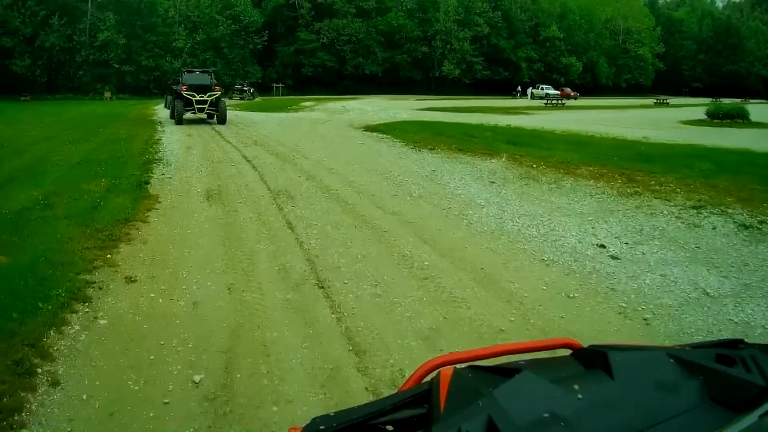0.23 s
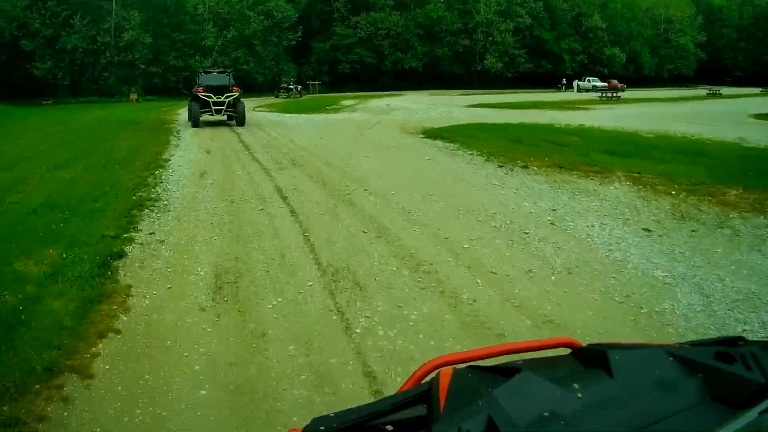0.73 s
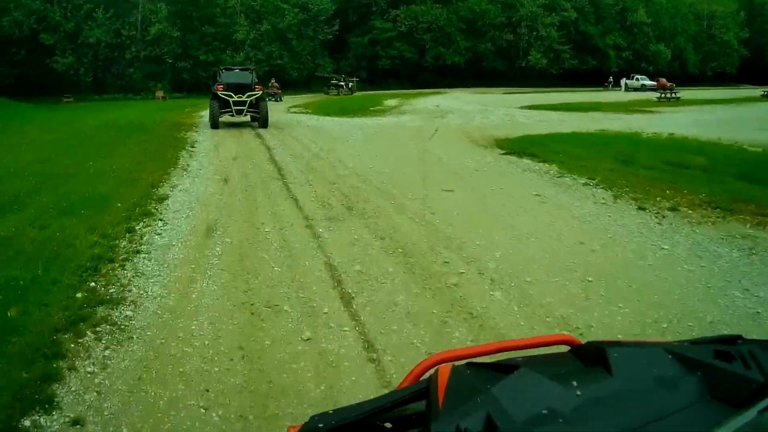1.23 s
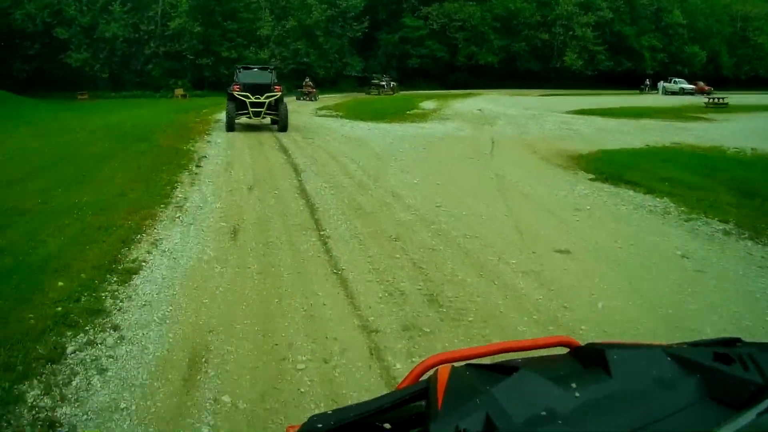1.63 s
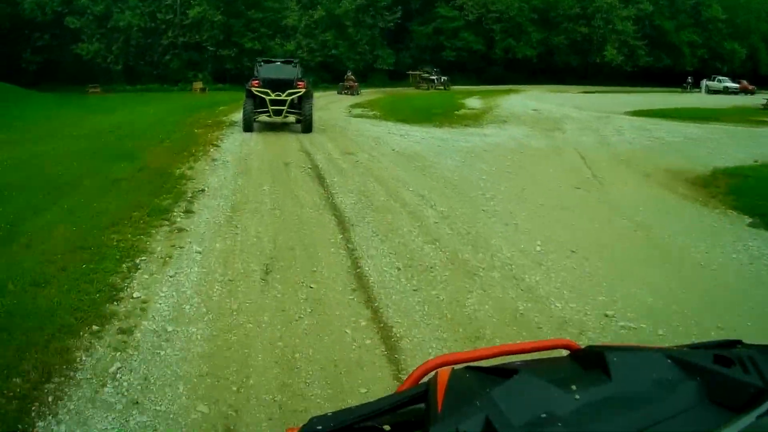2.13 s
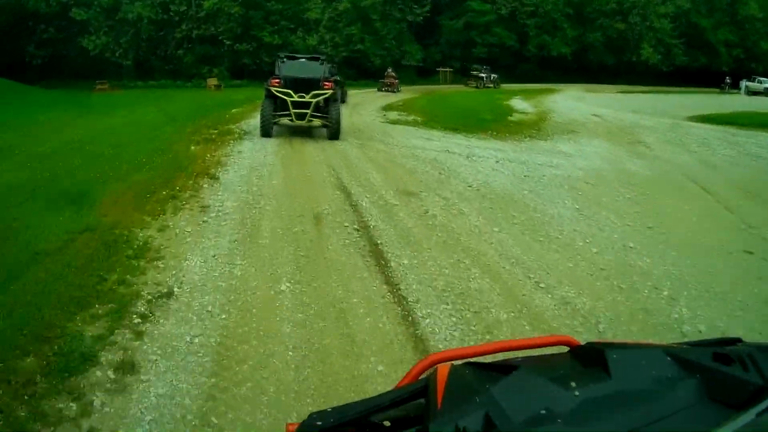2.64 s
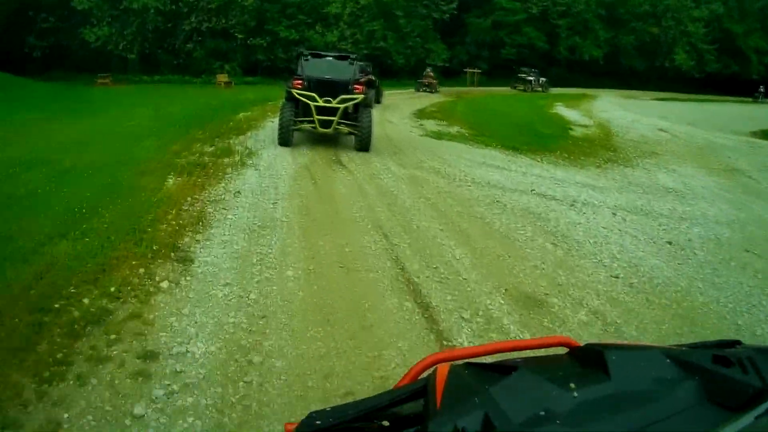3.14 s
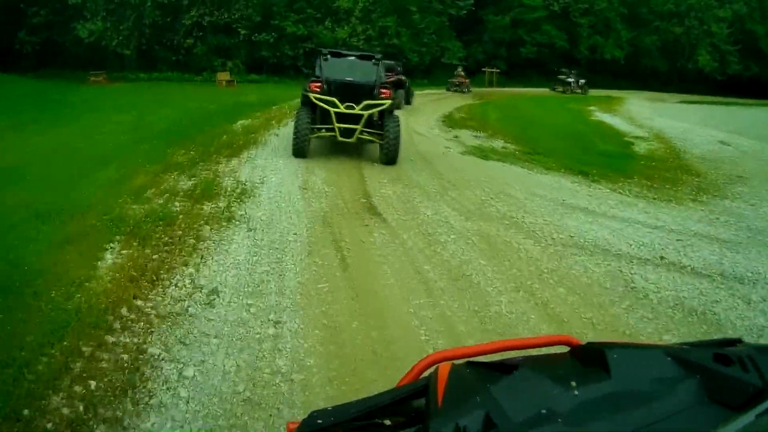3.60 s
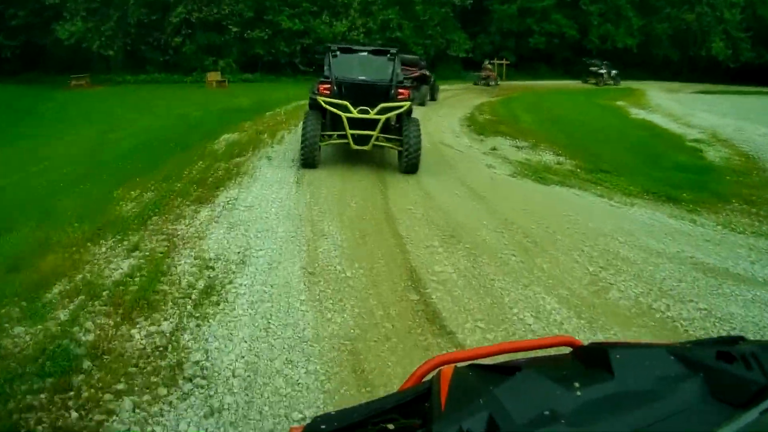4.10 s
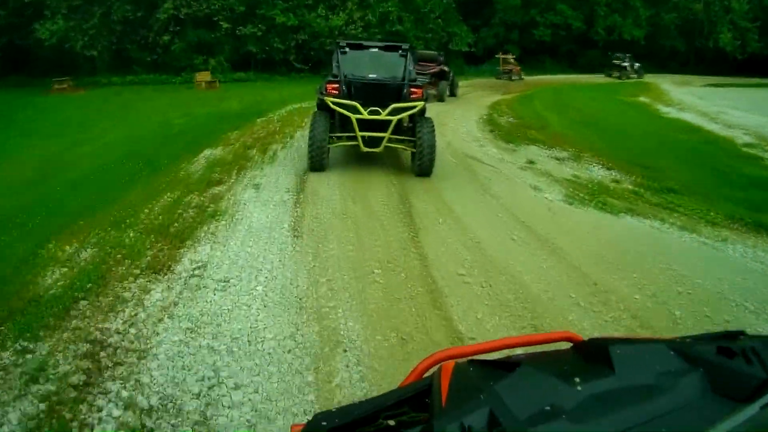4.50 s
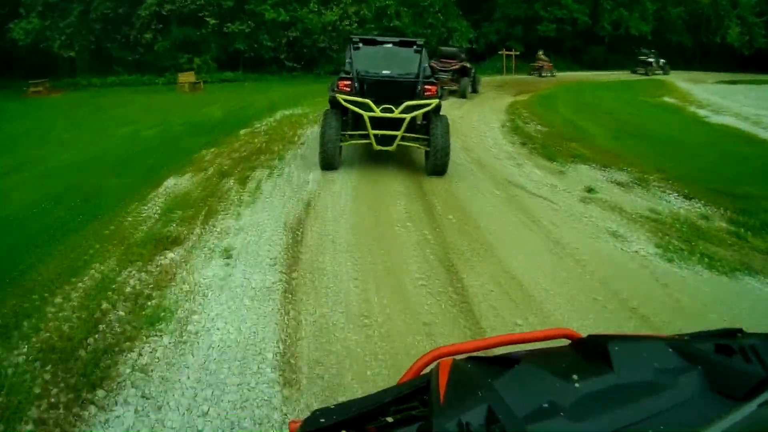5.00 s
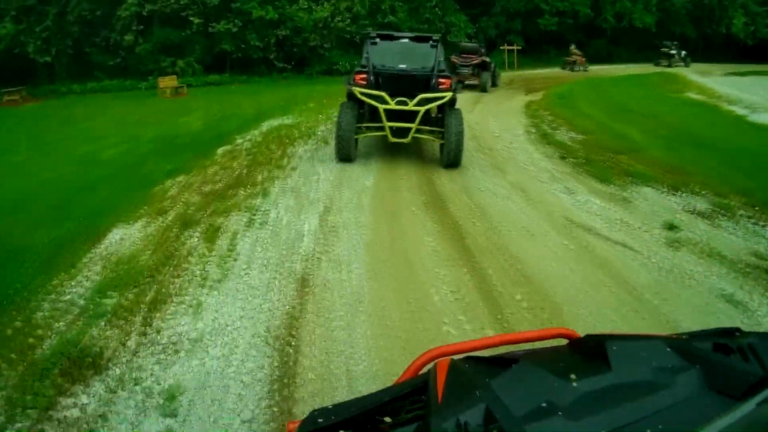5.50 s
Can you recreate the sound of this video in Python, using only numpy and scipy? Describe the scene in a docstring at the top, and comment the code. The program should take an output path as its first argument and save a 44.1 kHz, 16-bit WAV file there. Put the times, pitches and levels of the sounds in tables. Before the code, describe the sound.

An off-road buggy engine drones over rumbling gravel, eases off, coasts with low chugging knocks, then pulls again with a howl.

```python
"""An engine drones over rumbling, crunching gravel, heard from the open cab of an off-road buggy.
It cruises, eases off with a scrape of its drive belt, coasts with a low boom and runs of chugs,
then pulls again with a howl. The drone is a stack of "orders": tones at whole multiples of the
engine's cycle rate. The exhaust puffs, the valve gear clatters, a low two-note hum slowly rises
in pitch, bumps thud through the frame, and a few thrown stones tick against the body."""
import sys
import numpy as np
from scipy import signal
from scipy.fft import rfft, irfft
from scipy.io import wavfile
from scipy.ndimage import uniform_filter1d, minimum_filter1d

SR = 44100
rng = np.random.default_rng(int(sys.argv[2]) if len(sys.argv) > 2 else 0)


def generate_wav(sig):
    """Save sig (samples, or channels by samples) to the path in sys.argv[1] as 16-bit PCM at SR."""
    pcm = np.round(np.clip(np.atleast_2d(sig).T, -1, 1) * 32767).astype(np.int16)
    wavfile.write(sys.argv[1], SR, pcm)


N = 253575
TIME = np.arange(N) / SR


def amp(db):
    """Turns decibels into a number to multiply by."""
    return 10 ** (np.asarray(db) / 20)


def unit(x):
    """Scales a signal to an average (rms) strength of 1."""
    return x / np.sqrt(np.mean(x ** 2) + 1e-20)


def curves(table):
    """Joins timed rows with straight lines, giving one curve for each column after the time."""
    seconds, *columns = np.transpose(table)
    return [np.interp(TIME, seconds, column) for column in columns]


def wander(hz):
    """A smooth random wobble of strength 1, moving up to about hz times a second."""
    freqs = np.fft.rfftfreq(N, 1 / SR)
    return unit(irfft(rfft(rng.standard_normal(N)) / (1 + (freqs / hz) ** 4), N))


def colour(x, spectrum, size=8192):
    """Shapes the lows and highs of x with a filter that rings only after a sound, never before."""
    hz, db = np.transpose(spectrum)
    log_hz = np.log(abs(np.fft.fftfreq(size, 1 / SR)) + 1)
    log_gain = np.log(amp(np.interp(log_hz, np.log(hz), db, right=-100)))
    response = np.fft.ifft(np.exp(np.conj(signal.hilbert(log_gain)))).real
    return signal.oaconvolve(x, response[:size // 2])[:N]


def boost(pitch, peaks):
    """The decibels a tone gains or loses from the peaks and dips near its pitch."""
    return sum(db / (1 + ((pitch - centre) / width) ** 2) for centre, width, db in peaks)


# How fast the engine runs. Each row: time in seconds, cycles a second.
ENGINE_SPEED = [(0, 41.51), (.5, 41.45), (.8, 41.62), (1.28, 41.5), (1.53, 40.97), (1.7, 39.32),
                (1.9, 37.69), (2.15, 36.56), (2.47, 35.95), (2.61, 35.87), (2.75, 34.37), (2.95, 33.58),
                (3.09, 31.27), (3.35, 29.52), (3.8, 27.86), (4.45, 25.84), (4.8, 24.46), (5.09, 22.21),
                (5.2, 25.27), (5.3, 28.17), (5.4, 29.36), (5.61, 29.3), (5.75, 30.4)]

def crankshaft(start_turn=-.232):
    """The turning crank sets the beat: gives its speed and a running count of engine cycles."""
    cycle_hz, = curves(ENGINE_SPEED)
    return cycle_hz, start_turn + np.cumsum(cycle_hz) / SR


# Cruising, eased off, throttle closing, coasting, pulling. Each row: start in seconds, glide in
# seconds, then in dB the drone, lift of every third order, throb, boom, howl, shake, rasp and
# clatter, and last the depth of the exhaust puffs.
THROTTLE_STAGES = [(0, .01, 0.5, 5, -33.5, -26.5, -51, -19.5, -40, -34, 0.17),
                   (1.55, 0.19, 1.5, 1.8, -29.5, -33.5, -45, -21, -21, -35, 0.16),
                   (2.66, 0.071, -1.5, 4, -24, -15, -36, -27, -18, -35, 0.24),
                   (2.92, 0.2, -7.5, 0.5, -19, -16.5, -29.5, -29, -22.5, -36, 0.44),
                   (5.1, 0.19, -1, -1.5, -47, -21, -15.5, -35, -18, -35, 1.1)]

def throttle():
    """The engine's levels glide from one stage of the drive to the next."""
    levels = np.array(THROTTLE_STAGES[0][2:], float)[:, None]
    for start, glide_s, *target in THROTTLE_STAGES:
        share = np.clip((TIME - start) / glide_s, 0, 1)
        levels = levels * (1 - share) + np.array(target)[:, None] * share
    return levels


# The engine's tone before any boosts. Each row: pitch in Hz, level in dB.
ENGINE_TONE = [(60, -32), (120, -42), (225, -31), (400, -38.5), (600, -45), (1000, -48), (1500, -59.5),
               (1900, -70.5), (2500, -74)]
# Where the exhaust pipe and cab ring. Each row: pitch in Hz, half width in Hz, boost in dB.
PIPE_RINGS = [(179, 26, 7), (265.2, 20, 13), (340.4, 33, 15), (396.6, 22.3, 10.5), (463.6, 6.9, 14),
              (498, 2.6, 0), (536, 23, 14.5), (708, 26.3, 16.5), (770.5, 10, 10), (836, 16, 9),
              (1013, 36, 12.5), (1133, 17, 7.5), (1263, 12, 9), (1370, 6.4, 7.5), (1685, 62, 12.5),
              (2245, 17, 12), (2455, 7.3, 14)]
# Orders that stand out or hang back. Each row: order, half width in orders, boost or cut in dB.
ORDER_ACCENTS = [(10.1, .6, 1), (6.33, .7, -12.5), (11.33, .4, -11), (22.76, .6, -7), (24.2, .6, 3),
                 (29.45, .6, -10), (31, .4, 6), (40.3, .6, 3.5)]

def engine(cycle_hz, turns, drone_db, third_db, throb_db, boom_db, howl_db, shake_db):
    """A double thump each cycle makes a stack of tones, which slide through the pipe's resonances."""
    second_share, second_delay = 0.33, .239  # the second thump: its strength, its delay in cycles
    extra_db = {3: throb_db, 4: boom_db, 12: howl_db}  # the orders that throb, boom and howl
    crank = turns + .001 * wander(18.0)  # the crank never turns quite evenly
    tones = amp(shake_db) * np.cos(2 * np.pi * crank)  # the frame shakes once a cycle
    grid_hz = np.arange(1, SR // 16)
    hz, db = np.transpose(ENGINE_TONE)
    pipe_db = np.interp(np.log(grid_hz), np.log(hz), db) + boost(grid_hz, PIPE_RINGS)
    for order in range(2, 61):
        order_hz = order * cycle_hz
        thump_pair = abs(1 + second_share * np.exp(-2j * np.pi * order * second_delay))
        bright_db = drone_db * np.log2(np.maximum(order_hz / 390, 1))  # load lifts tones above 390 Hz
        accent_db = boost(order, ORDER_ACCENTS) + third_db * (order % 3 == 0)
        gain = thump_pair * amp(drone_db + bright_db + accent_db + np.interp(order_hz, grid_hz, pipe_db))
        if order in extra_db:
            gain = np.hypot(gain, amp(extra_db[order]))
        # higher orders arrive later through the pipe, and further out of step
        lag = order * (0.917 + 0.054 * rng.standard_normal()) + .14 * max(order - 13, 0) ** 2
        tones -= gain * np.cos(2 * np.pi * order * crank - lag)
    uneven = 1 + .08 * wander(25)  # no two firings are equally strong
    lope = .15 * np.clip((TIME - 5.12) * 10, 0, 1)  # in the final pull, every second cycle is stronger
    return np.sqrt(2) * tones * uneven * (1 + lope * np.cos(np.pi * turns))


# The tone of the rushing gas. Each row: pitch in Hz, relative level in dB.
EXHAUST_TONE = [(100, -24.5), (230, -4.5), (340, 3), (420, -7), (500, -6.5), (620, -8), (780, -11.5),
                (1100, -16), (2000, -53.5)]

def exhaust_rasp(turns, level_db, depth, uneven_db=2.0, trim_db=-1):
    """Gas leaves the exhaust in one uneven puff a cycle; deeper puffs throb harder."""
    puffs = np.exp(depth * np.cos(2 * np.pi * turns - 0.68))
    puffs /= np.sqrt(np.i0(2 * depth))  # keeps the power the same at any depth
    puffs *= amp(uneven_db * wander(15))
    return amp(level_db + trim_db) * unit(colour(puffs * rng.standard_normal(N), EXHAUST_TONE))


# The tone of the rattling metal. Each row: pitch in Hz, relative level in dB.
CLATTER_TONE = [(200, -7), (450, 4), (800, 0), (1050, -5), (1200, -6), (1450, -6.5), (1690, -9),
                (1900, -14.5), (2300, -17.5), (2600, -23), (2900, -25.5), (4500, -41), (9000, -83)]

def clatter(turns, level_db, drone_db, loose_db=5.5, repeat_db=-17.5):
    """Valve gear and clutch rattle; part repeats every cycle, more so when the drone is strong."""
    pattern = sum(np.cos(2 * np.pi * (order * turns + rng.random())) for order in range(30, 64))
    repeating = unit(colour(pattern, CLATTER_TONE))
    beat = np.exp(0.032 * np.cos(2 * np.pi * turns - 1) + 0.058 * np.cos(8 * np.pi * turns))
    loose = unit(colour(beat * rng.standard_normal(N), CLATTER_TONE))
    return amp(level_db) * (amp(loose_db) * loose + amp(repeat_db + drone_db) * repeating)


# The belt's scrape, loudest as the throttle eases. Each row: time in seconds, level in dB.
BELT_LEVELS = [(0, -41), (1.5, -42), (1.9, -52), (2.35, -43), (2.47, -31), (2.58, -34), (2.68, -52),
               (2.8, -37.5), (3.1, -47), (5.75, -58)]
# The ring of its housing. Each row: pitch in Hz, relative level in dB.
HOUSING_TONE = [(700, -41), (1350, -21), (1550, 3), (1680, 2), (1780, -5), (1950, -11), (3500, -25.5),
                (8000, -58)]

def belt(turns, depth=0.67):
    """The slack drive belt scrapes twice a cycle and rings its housing."""
    level_db, = curves(BELT_LEVELS)
    scrape = np.exp(depth * np.cos(4 * np.pi * turns)) * rng.standard_normal(N)
    return amp(level_db) * unit(colour(scrape, HOUSING_TONE))


# The tones of the rumble and of the deeper sway. Each row: pitch in Hz, relative level in dB.
RUMBLE_TONE = [(30, -18.5), (70, -11), (100, -8.5), (135, 1.5), (175, -3.5), (215, -6), (260, -11.5),
               (350, -21.5), (800, -53), (3000, -79)]
SWAY_TONE = [(8, -34.5), (18, -6), (30, 4), (60, 2.5), (90, 4), (160, -19), (400, -63.5)]

def chassis(rumble_db, sway_db, thud, lumpy_db=0.5):
    """The frame and panels rumble and sway; a bump swells the sway into a deep thud."""
    shaking = rng.standard_normal(N) * amp(lumpy_db * wander(51))
    rumble = unit(colour(shaking, RUMBLE_TONE))
    sway = unit(colour(rng.standard_normal(N), SWAY_TONE))
    return amp(rumble_db) * rumble + (amp(sway_db) + thud) * sway


# The low hum. Each row: time in seconds, lower note in Hz, level in dB before the cab's boost.
RISING_HUM = [(0, 92, -44.5), (1.3, 96, -32.5), (2.0, 102, -32), (2.55, 106, -38.5), (2.75, 107.5, -37),
              (3.3, 112, -27), (3.55, 116, -23.5), (3.7, 121, -25), (4.1, 131, -28), (4.5, 137, -25.5),
              (5.0, 143.3, -26), (5.75, 147, -29.5)]
# Where the cab rings and boosts the hum. The one row: pitch in Hz, half width in Hz, boost in dB.
CAB_RING = [(138.4, 20.4, 9)]

def rising_hum(upper_ratio=1.26, waver_cycles=0.06, flutter=0.16):
    """A low two-note hum slowly rises in pitch; each note wavers and flutters on its own."""
    hz, level_db = curves(RISING_HUM)
    cycles = np.cumsum(hz) / SR
    hum = np.zeros(N)
    for ratio in (1, upper_ratio):
        tone = np.sin(2 * np.pi * (ratio * cycles + waver_cycles * wander(1.2)))
        hum += amp(boost(ratio * hz, CAB_RING)) * tone * (1 + flutter * wander(33))
    return np.sqrt(2) * amp(level_db) * hum


# The tone of the crunch. Each row: pitch in Hz, relative level in dB.
CRUNCH_TONE = [(1500, -9), (2900, -3.5), (3700, 3.5), (4500, -5.5), (5250, 1.5), (6300, -5), (7200, -11.5),
               (9100, -13.5), (10200, -5), (11400, -18), (12500, -19), (13500, -23.5), (15000, -33),
               (16000, -36.5)]

def gravel(level_db, grains_per_s=1500, spread_db=1.3):
    """Small stones crunch under the wheels: separate grains in a wash of grit."""
    sizes = amp(spread_db * np.minimum(rng.exponential(1, N), 5))
    signs = rng.choice([-1, 1], N)
    grains = unit(sizes * signs * (rng.random(N) < grains_per_s / SR))
    grit = rng.standard_normal(N)
    return amp(level_db) * unit(colour(grains + grit, CRUNCH_TONE))


# Stones hitting the body. Each row: start in seconds, relative peak in dB, top of the tick in Hz.
STONE_HITS = [(0.032, -38.5, 7000), (0.248, -41, 5000), (0.323, -43, 4970), (0.522, -44, 6000),
              (1.331, -41, 5000), (1.616, -36, 4000), (1.8365, -36, 11000), (1.904, -45, 5000),
              (2.185, -46, 8000), (2.436, -40, 7000), (2.665, -33.5, 9000), (3.03, -39, 5000),
              (3.2325, -44, 9000), (3.4375, -32, 8000), (3.861, -40, 6000), (3.8896, -34, 4000),
              (3.9155, -39, 7000), (4.0621, -40, 7000), (4.844, -39, 6000)]

def stones(fade_s=0.027, trim_db=4.0, low_hz=1900):
    """A thrown stone gives a short tick, bright or dull by where it lands."""
    out = np.zeros(N)
    t = np.arange(SR // 20) / SR
    for start, db, top_hz in STONE_HITS:
        band = signal.butter(2, [low_hz, top_hz], "bandpass", fs=SR, output="sos")
        tick = signal.sosfilt(band, rng.standard_normal(len(t)) * amp(-60 * t / fade_s))
        out[round(start * SR):][:len(t)] += amp(db + trim_db) * tick / abs(tick).max()
    return out


# Bumps. Each row: middle in seconds, half length in seconds, thud in dB, change of the rumble in dB.
ROAD_BUMPS = [(0.347, 0.067, -18, -5), (1.256, 0.079, -29, -0.5), (1.878, 0.07, -29, 1),
              (3.143, 0.18, -22, 6), (3.827, 0.079, -19, 2.5)]

def bumps():
    """Bumps jolt the frame: gives the strength of the thud and the rumble's change in dB over time."""
    return sum(np.outer([amp(thud_db), rumble_db], np.exp(-((TIME - middle) / half_s) ** 2))
               for middle, half_s, thud_db, rumble_db in ROAD_BUMPS)


# Chugs, mostly while coasting and as the pull begins. Each row: start in seconds, relative peak in dB.
CHUG_HITS = [(1.951, -8), (2.723, -15), (3.332, -13), (3.426, -14), (3.532, -11), (3.639, -9), (3.697, -19),
             (3.83, -23), (3.862, -4), (3.89, -8), (3.917, -6), (4.06, -5.5), (4.086, -8), (4.114, -4.5),
             (4.14, -10), (4.254, -7.5), (4.282, -10), (4.334, -18), (4.472, -7), (4.499, -12),
             (4.528, -14), (4.634, -12), (4.767, -7), (4.794, -5), (4.819, -12), (4.93, -14), (4.978, -10),
             (5.024, -14), (5.111, -10), (5.148, -9), (5.186, -7.5), (5.225, -7), (5.299, -8), (5.372, -10),
             (5.443, -3), (5.552, -3), (5.613, -9)]
# The tone of one chug. Each row: pitch in Hz, relative level in dB.
CHUG_TONE = [(80, -42), (220, 11), (400, 8), (600, 2), (750, -10), (1000, -13.5), (1700, -28.5),
             (2800, -43.5), (8000, -53)]

def chugs(grit=0.062, rattle_s=.006, trim_db=2):
    """The drive snatches at its slack: each chug is a sharp knock with a short rattle behind it."""
    out = np.zeros(N)
    t = np.arange(SR // 25) / SR
    for start, db in CHUG_HITS:
        burst = grit * rng.standard_normal(len(t)) * np.exp(-t / rattle_s)
        burst[0] -= 2  # the knock
        chug = colour(burst, CHUG_TONE)
        out[round(start * SR):][:len(chug)] += amp(db + trim_db) * chug / abs(chug).max()
    return out


# How loose the road is. Each row: time in seconds, extra crunch in dB.
ROAD_LOOSENESS = [(0, 2), (1.5, 3), (2.5, 6), (3.2, 5.5), (3.8, 5), (4.2, 7), (4.35, 12), (5.75, 10)]

def scene():
    """All the sounds in one channel; looser ground lifts the crunch, clatter and rumble."""
    cycle_hz, turns = crankshaft()
    drone_db, third_db, throb_db, boom_db, howl_db, shake_db, rasp_db, clatter_db, depth = throttle()
    loose_db, = curves(ROAD_LOOSENESS)
    thud, jolt_db = bumps()
    patches_db = wander(17)  # patches of coarser and finer stone
    lug_hz = np.maximum(27.05 - cycle_hz, 0)  # too slow, the engine labours: drone, howl and rasp grow
    motor = engine(cycle_hz, turns, drone_db + 0.62 * lug_hz, third_db, throb_db, boom_db,
                   howl_db + 2 * lug_hz, shake_db)
    puffs_and_chugs = exhaust_rasp(turns, rasp_db + 0.34 * lug_hz, depth) + chugs()
    rattle = clatter(turns, clatter_db + 0.75 * loose_db + patches_db, drone_db) + belt(turns)
    body = chassis(rumble_db=-22 + 0.27 * loose_db + jolt_db, sway_db=-18 + 0.33 * shake_db, thud=thud)
    hum = rising_hum()
    road = gravel(level_db=-53 + loose_db + 0.5 * patches_db) + stones()
    return (motor + puffs_and_chugs + rattle + body + hum + road)[None]


def record(dry, ceiling=.98, smooth_samples=130, top_hz=15700):
    """A fast limiter turns the loudest peaks down, then a filter cuts the highest treble."""
    gain = np.minimum(1, ceiling / (abs(dry) + 1e-9))
    gain = minimum_filter1d(gain, 2 * smooth_samples)
    gain = uniform_filter1d(uniform_filter1d(gain, smooth_samples), smooth_samples)
    lowpass = signal.firwin(511, top_hz, window=("kaiser", 9), fs=SR)
    return signal.oaconvolve(dry * gain, lowpass[None], "same")


dry = scene()
out = record(dry)
generate_wav(out)
```